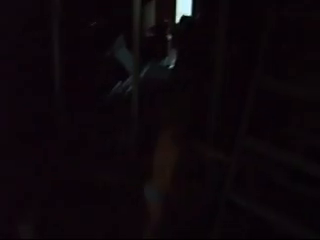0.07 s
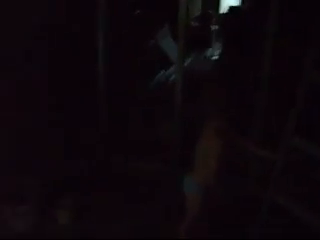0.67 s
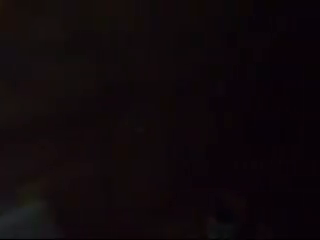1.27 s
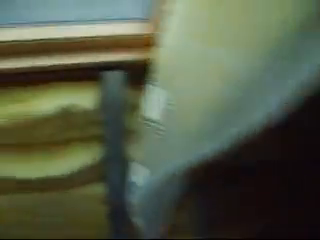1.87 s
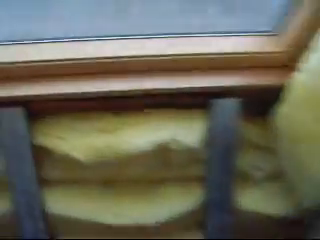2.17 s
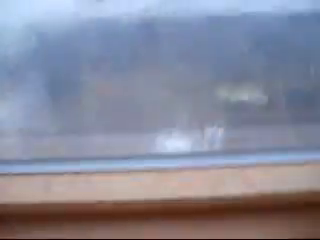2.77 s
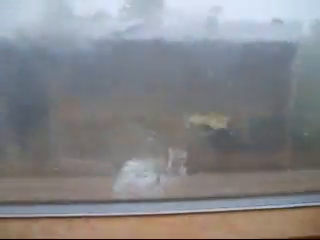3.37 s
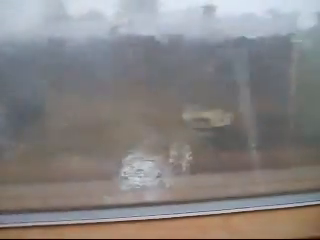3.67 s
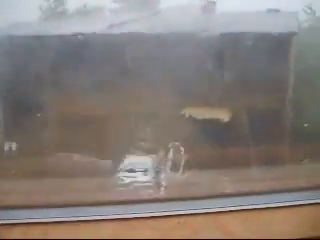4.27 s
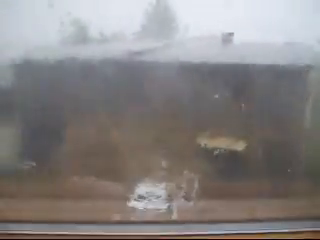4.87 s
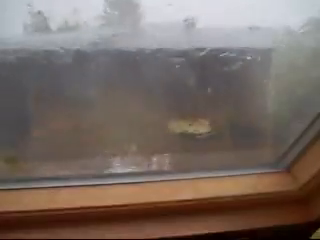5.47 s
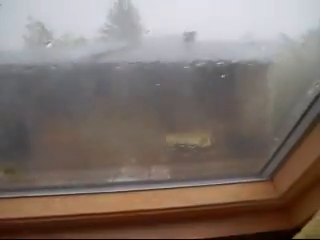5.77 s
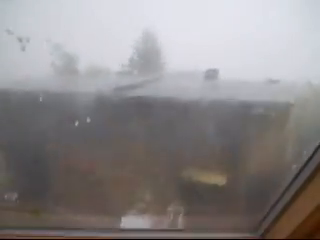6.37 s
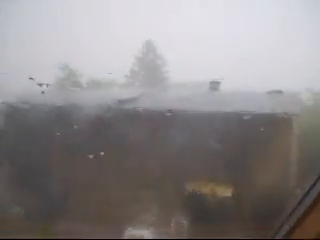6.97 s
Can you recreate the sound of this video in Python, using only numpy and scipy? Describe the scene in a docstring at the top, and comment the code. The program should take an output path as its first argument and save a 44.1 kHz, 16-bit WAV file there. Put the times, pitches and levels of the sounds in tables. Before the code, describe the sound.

Heard from inside an attic, a hailstorm batters the roof with a dense, uneven run of wooden knocks and rattles, heaviest at the start. Beneath them run a fine patter of small hail and a deep, steady rumble. Sharp cracks stand out as single stones hit the nearby roof window and shake its frame. Two of these, one in the middle and one just before the end, are loud enough to briefly distort the microphone.

```python
"""A bare attic under hail, heard from inside on the way up to a roof window.
Small hail patters over the storm's low rumble. Big stones far along the roof spread through the deck
as rattling bursts; those overhead knock on single boards, each with its own hollow note. Stones on
the window crack, rattle the sash and ring the pane; the loudest overload the microphone."""
import sys
import numpy as np
from scipy import signal
from scipy.fft import rfft, irfft
from scipy.io import wavfile
from scipy.ndimage import uniform_filter1d

SR = 44100
rng = np.random.default_rng(int(sys.argv[2]) if len(sys.argv) > 2 else 0)


def store_wav(level_fs):
    """Save 16-bit WAV to argv[1]."""
    pcm = np.round(np.clip(np.atleast_2d(level_fs), -1, 1) * 32767)
    wavfile.write(sys.argv[1], SR, pcm.T.astype(np.int16))


N = 313992
HIT_SAMPLES = 16384
AGE_S = np.arange(HIT_SAMPLES) / SR


def gain(db):
    """Decibels to amplitude."""
    return 10 ** (np.asarray(db) / 20)


def unit_rms(x):
    """Scales to an rms of 1."""
    return x / np.sqrt(np.mean(x ** 2) + 1e-20)


def smooth_noise(width, passes=1, count=HIT_SAMPLES):
    """Noise averaged over width points, rms 1."""
    noise = rng.standard_normal(count)
    for _ in range(passes):
        noise = uniform_filter1d(noise, size=width)
    return unit_rms(noise)


def lookup(table, hz):
    """Reads a table on a log-frequency axis."""
    freq_hz, value = np.transpose(table)
    return np.interp(np.log(hz + 1), np.log(freq_hz), value)


def add(mix, start_s, sound):
    """Mixes a sound in, in place."""
    part = mix[max(round(start_s * SR), 0):][:len(sound)]
    part += sound[:len(part)]


def swell(rise_s):
    """Onset with time constant rise_s."""
    return 1 - np.exp(-AGE_S / rise_s)


def mode(freq_hz, level_db, t60_s):
    """One damped resonance."""
    return gain(level_db - 60 * AGE_S / t60_s) * np.sin(2 * np.pi * freq_hz * AGE_S)


def contact(spectrum, hard_db_oct=0, thud_db=0, peak_hz=900, peak_db=0, peak_width=0.1,
            pivot_hz=700, ripple_db=0):
    """Click of energy 1: hard ice adds treble, a heavy stone bass, the struck spot a resonance."""
    hz = np.fft.rfftfreq(HIT_SAMPLES, 1 / SR) + 1
    db = lookup(spectrum, hz) + ripple_db
    db += hard_db_oct * np.maximum(np.log2(hz / pivot_hz), 0)
    db += thud_db * np.exp(-(np.log2(hz / 170) / 1.23) ** 2)  # bump at 170 Hz
    db += peak_db / (1 + (np.log(hz / peak_hz) / peak_width) ** 2)
    log_gain = np.log(gain(np.r_[db, db[-2:0:-1]]))
    minimum_phase = np.exp(signal.hilbert(log_gain).conj())[:len(hz)]
    click = irfft(minimum_phase, HIT_SAMPLES)[:HIT_SAMPLES // 8]
    return click / np.linalg.norm(click)


# Storm rumble spectrum: freq_hz, level_db
RUMBLE_SPECTRUM = [(25, 0), (55, -3), (95, 2), (200, -24.5), (800, -82)]

def rumble(level_db=-57.5):
    """The storm's steady, deep rumble through the house."""
    noise = signal.oaconvolve(rng.standard_normal(N), contact(RUMBLE_SPECTRUM))[:N]
    return gain(level_db) * unit_rms(noise)


# Ring time of deck and attic: freq_hz, t60_s
ATTIC_DECAY = [(100, 0.17), (260, 0.28), (700, 0.225), (1800, 0.24), (5000, 0.25), (8500, 0.255),
               (12000, 0.2)]

def reflections(click, echoes_per_s=5000, clump_db=1.5):
    """Separate echoes in deck and attic arrive in small clumps and die steadily."""
    taps = np.sign(rng.standard_normal(HIT_SAMPLES)) * (rng.random(HIT_SAMPLES) < echoes_per_s / SR)
    taps *= gain(clump_db * smooth_noise(110))
    echoes = irfft(rfft(taps) * rfft(click, HIT_SAMPLES))
    echoes /= np.sqrt(uniform_filter1d(echoes ** 2, size=700))  # energy flows out evenly
    hz, time_s, bands = signal.stft(echoes, SR, nperseg=256)
    decay = gain(-60 * time_s / lookup(ATTIC_DECAY, hz)[:, None])
    return signal.istft(bands * decay, SR, nperseg=256)[1][:HIT_SAMPLES]


# Small hail spectrum: freq_hz, level_db
PATTER_SPECTRUM = [(25, -33), (60, -29), (130, 11.5), (300, 4.5), (650, 9.5), (1000, 9.5), (1800, 6),
                   (3500, 0.5), (6000, -7.5), (9000, -17), (11000, -36), (13000, -38)]
# Small hail, louder deep in the attic than at the window: time_s, level_db
PATTER_ENVELOPE = [(0, -31), (1.45, -29.5), (1.88, -32.5), (2.88, -36.5), (4.1, -39.5), (4.7, -41),
                   (5.55, -33.5), (5.9, -43), (7.05, -34)]

def patter(stones_per_s=70, patches=8, size_spread_db=4.0, wash_gain=0.37):
    """Small stones land at random all over the roof, above an even wash of the farthest ones."""
    click, taps = contact(PATTER_SPECTRUM), np.zeros(N)
    for _ in range(patches):
        sizes = gain(size_spread_db * np.minimum(rng.exponential(1, N), 2))
        stones = sizes * (rng.random(N) < stones_per_s / patches / SR)
        taps += signal.oaconvolve(stones, reflections(click) * swell(0.0009))[:N]
    wash = signal.oaconvolve(rng.standard_normal(N), click)[:N]
    level_db = np.interp(np.arange(N) / SR, *np.transpose(PATTER_ENVELOPE))
    return gain(level_db) * unit_rms(unit_rms(taps) + wash_gain * wash)


def spot_ripple_db(depth_db=2.2):
    """Chance resonances of one struck spot: no two blows have the same colour."""
    return depth_db * smooth_noise(50, passes=2, count=HIT_SAMPLES // 2 + 1)


def chips(spectrum, hard_db_oct, ripple_db=0, chips_per_s=130, fade_s=0.11):
    """The stone shatters: a few chips, brighter than the stone, tick on the roof."""
    click = contact(spectrum, hard_db_oct + 0.71, ripple_db=ripple_db)
    ticks = np.sign(rng.standard_normal(HIT_SAMPLES)) * (rng.random(HIT_SAMPLES) < chips_per_s / SR)
    return signal.oaconvolve(1.6 * ticks * np.exp(-AGE_S / fade_s), click)[:HIT_SAMPLES]


# Roof board modes: pitch_ratio, level_db, t60_s
BOARD_MODES = [(0.789, -12.5, 0.096), (1, 3, 0.038), (1.23, -25, 0.046), (1.5, -10, 0.095)]

def board(pitch_hz):
    """The hollow ring of one roof board; its close modes beat."""
    return swell(0.0009) * sum(mode(pitch_hz * ratio, db, t60_s) for ratio, db, t60_s in BOARD_MODES)


# Spectrum of a blow on the roof: freq_hz, level_db
ROOF_SPECTRUM = [(30, -34), (65, -23), (110, -2.5), (170, -6), (330, -3.5), (480, 1.5), (680, 5), (1000, 5),
                 (1600, 0.5), (3200, -4), (5000, -11.5), (7800, -22), (9400, -34), (11000, -55)]
# Big stones along the roof: start_s, level_db, hard_db_oct, thud_db, distance_m
ROOF_STONES = [(0.0, -11, 0, 0, 1.6), (0.047, -7.5, 4, 3, 9.3), (0.075, -7, -2, 0, 11.6),
               (0.296, -12.5, 3, -5, 4.5), (0.375, -10, 4.5, 13, 4.3), (0.388, -9, -2, -5, 3.6),
               (0.431, -12.5, 1, -5, 4.1), (0.765, -19.5, 2, 3, 0.56), (0.908, -24, 6, 4, 0.49),
               (1.016, -14.5, 2.5, 8, 3.4), (1.043, -10.5, 2, 8, 6.4), (1.205, -9.5, 1, -4, 2.4),
               (1.512, -10.5, -1, 0, 6.4), (1.62, -10, 0.1, 1, 7.2), (1.679, -15.5, 0.5, -32, 1.9),
               (1.926, -21.5, 1, 3, 3.5), (1.972, -20, 3.5, 5, 5.1), (2.024, -19.5, 1, -7, 0.65),
               (2.212, -11.5, -2, 2, 5.7), (2.241, -15, 4, 4, 2.4), (2.398, -24, 1.5, 2, 4.6),
               (2.57, -12, 2, 1, 22), (2.705, -18, 3, -10, 5.9), (3.007, -16.5, 1, -31, 2.6),
               (3.108, -17.5, -0.5, 7.5, 4.5), (3.165, -13.5, 1.5, 4, 6.4), (3.32, -20, 2.5, 10.5, 5),
               (3.433, -18, 3, -8, 13.7), (3.541, -22, 1.5, 10, 3.1), (3.609, -17, -0.5, 6, 5.5),
               (3.651, -20, 1, 1, 1.1), (3.819, -13, -.5, 12, 4.4), (4.02, -30, -4.5, -46, 2.5),
               (4.129, -24, 0.5, 7, 14), (4.205, -14.5, 0.5, 10, 4.1), (4.288, -19.5, 1, 6.5, 2.6),
               (4.48, -23, 1.5, 6, 12), (4.589, -15.5, 1.5, -2, 2.1), (4.982, -22.5, 1, -1, 1.6),
               (5.108, -18.5, 0, 2, 5.3), (5.248, -15.5, -2.5, 4, 9.3), (5.278, -12.5, -1, -4, 8.6),
               (5.376, -19.5, 3, 10, 0.81), (5.57, -22.5, 0.5, 17, 3), (5.66, -19, 2, -18, 8.2),
               (5.71, -23.5, 1, -15, 0.89), (5.76, -23, 1.5, 15.5, 1.1), (5.797, -19, -1, -30, 1.9),
               (5.968, -22.5, 1, -3, 4.2), (6.112, -23, 1, 3, 2.3), (6.298, -20, 0.5, -13, 2.4),
               (6.361, -20, -1, 2, 15), (6.503, -16, -0.5, -11, 8.8), (6.6, -11, -2, -21, 23.5),
               (6.698, -12, 1.5, -10, 3.2), (6.772, -15, 2, -12, 7.4), (6.822, -15, -2, -5, 1),
               (7.067, -19.5, -4.5, -12, 1.5)]

def roof_hit(level_db, hard_db_oct, thud_db, distance_m, rise_s_per_m=0.0027, reach_m=2.3):
    """Near blows keep a tick and a faint board note; far ones spread through the deck and swell slower."""
    nearness = np.exp(-distance_m / reach_m)
    pitch_hz, ripple_db = rng.uniform(600, 1300), spot_ripple_db()
    click = contact(ROOF_SPECTRUM, hard_db_oct, thud_db, ripple_db=ripple_db)
    deck = reflections(click) + chips(ROOF_SPECTRUM, hard_db_oct, ripple_db)
    sound = deck * swell(rise_s_per_m * distance_m) + nearness * gain(-4.5) * board(pitch_hz)
    add(sound, 0, 5 * nearness * click)
    return gain(level_db - 0.14) * sound


def crack(click, clatter_s, room_db=-17, room_rise_s=0.0012):
    """A contact click, a few milliseconds of clatter in what was struck, then the room."""
    clatter = rng.standard_normal(HIT_SAMPLES) * np.exp(-AGE_S / clatter_s)
    clatter[0] -= 3  # first touch
    direct = signal.oaconvolve(clatter, click)[:HIT_SAMPLES]
    direct *= np.sqrt(clatter_s * SR / 2) / np.linalg.norm(direct)
    return direct + gain(room_db) * reflections(click) * swell(room_rise_s)


# Big stones overhead: start_s, level_db, hard_db_oct, thud_db, pitch_hz, ring_db, deck_db
OVERHEAD_STONES = [(0.292, -16, -5, -5, 724, 1, 6), (0.402, -17.5, -4, 3, 670, 3, 0.5),
                   (0.4729, -13.5, 0, 5, 554, 5, -0.5), (0.527, -18, -0.5, 4.5, 740, 8, 3.5),
                   (0.6215, -13, -1, -5, 755, 2, 3), (0.736, -19, 3.5, 1, 1366, -6, 0),
                   (1.295, -14, -1.5, 5, 778, 0, -8), (1.375, -21.5, 3, 6, 1180, -1, 4.5),
                   (1.8156, -15, 2, -6, 1670, -2.5, -15), (2.181, -19, -1.5, 3, 827, 8, 1.5),
                   (2.422, -16, 2.5, 18, 1790, -4.5, -9.5), (2.449, -19, 5, -14, 975, 1, -5),
                   (2.464, -17.5, -1, -2, 925, 5.5, 5.5), (2.751, -21.5, 0.5, -2.5, 835, 0, 4),
                   (3.044, -17, 0, 2, 1314, 7, -1.5), (3.241, -20.5, 1.5, 12.5, 1010, -4, -0.5),
                   (4.08, -24, -4, 6, 1026, 3.5, -1), (4.235, -20, 2.5, 0, 783, 6.5, -6.5),
                   (4.535, -23.5, -1.5, 9, 614, -10, 4.5), (4.635, -19.5, 1, 13, 556, 2.5, -9),
                   (4.745, -23, 0, -3, 810, -3, 4), (4.94, -21.5, 1.5, 9, 926, -11, -1),
                   (5.172, -20, 2.5, -4, 830, 5.5, 2), (5.431, -20, -0.5, -29, 770, -3, -1.5),
                   (5.553, -27, -4.5, -13, 710, 3, 1), (5.624, -26.5, -0.5, 10, 770, 4.5, 4.5),
                   (6.025, -25.5, 1, 8, 918, 2, -1), (6.789, -23.5, 1, -7, 670, 8, 3),
                   (7.08, -20.5, 2.5, 14, 854, 11.5, -5)]

def overhead_knock(level_db, hard_db_oct, thud_db, pitch_hz, ring_db, deck_db, slap_s=0.0085):
    """A hard crack, the board's note, its slap back on the rafter, then the deck and a few chips."""
    click = contact(ROOF_SPECTRUM, hard_db_oct, thud_db, pitch_hz, peak_db=4.5, peak_width=0.088,
                    ripple_db=spot_ripple_db())
    note = gain(ring_db) * board(pitch_hz)
    sound = crack(click, clatter_s=0.0028, room_db=deck_db, room_rise_s=0.001) + note
    add(sound, round(slap_s * pitch_hz) / pitch_hz, gain(-11) * note)  # slap in step with the swing
    sound += gain(deck_db - 3) * chips(ROOF_SPECTRUM, hard_db_oct)
    return gain(level_db) * sound


# Low pane modes: freq_hz, level_db, t60_s
PANE_MODES = [(167, -28.5, 0.38), (269, -27, 0.22), (325, -30, 0.24), (412, -35, 0.14), (562, -16, 0.07),
              (700, -14.5, 0.125)]

def pane(place_frac, roughness=0.48):
    """Low modes beat, roughened by the loose sash; the place of the blow decides which ones wake."""
    hum = 0
    for order, row in enumerate(PANE_MODES, 1):
        jostle = 1 + roughness * smooth_noise(400)
        hum += np.sin(order * np.pi * place_frac) * jostle * mode(*row)
    return hum * swell(0.019) * (1 - AGE_S / AGE_S[-1])  # the heavy pane is slow to swing


# Spectrum of a blow on the window: freq_hz, level_db
WINDOW_SPECTRUM = [(30, -16), (70, -9), (160, 1), (400, 1.5), (750, 2), (1300, -2), (2000, 0.5), (3000, -1),
                   (5000, -2.5), (8500, -9), (10200, -19), (13000, -37), (16000, -44)]
# Stones on the window: start_s, level_db, hard_db_oct, thud_db, clatter_s, spot_hz,
# rebound_step_db, rebound_hard_db_oct, sash_hz, place_frac
WINDOW_STONES = [(0.48, -7, 0, -11, 0.0035, 3970, -7.5, -3, 2420, 0.8),
                 (1.3124, -4.5, -9.5, 1, 0.0068, 1036, -10.5, -3, 1750, 0.15),
                 (1.791, -8, -4, -5.5, 0.0027, 753, -14, 3, 1670, 0.09),
                 (2.927, -23, 1.5, -15, 0.0052, 1060, -4.5, -8.5, 2450, 0),
                 (3.7198, 2, -2, -3, 0.0025, 3130, -8.5, -10, 615, 0.43),
                 (4.789, -9, -2, -10.5, 0.0055, 2900, -29, 11, 1040, 0.24),
                 (4.907, -20.5, -8, -1, 0.0056, 1120, -20, -14, 1700, 0.53),
                 (5.3153, -3, -9, -3.5, 0.0052, 1000, -9.5, -3, 1200, 0.12),
                 (5.489, -14.5, 0, -43, 0.01, 650, -6.5, -3, 2410, 0.1),
                 (6.838, 2.5, -9, 2, 0.0023, 834, -10.5, -3.5, 2400, 0.3)]

def window_hit(level_db, hard_db_oct, thud_db, clatter_s, spot_hz,
               rebound_step_db, rebound_hard_db_oct, sash_hz, place_frac, pivot_hz=1330):
    """The stone cracks on glass, the sash rattles in its frame, the stone lands again, the pane hums."""
    glass_click = contact(WINDOW_SPECTRUM, hard_db_oct, thud_db - 2, spot_hz,
                          peak_db=11.5, peak_width=0.028, pivot_hz=pivot_hz)
    sash_click = contact(WINDOW_SPECTRUM, rebound_hard_db_oct, thud_db, sash_hz,
                         peak_db=7, peak_width=0.14, pivot_hz=pivot_hz)
    sound = crack(glass_click, clatter_s)
    for rebound in (1, 2):
        gap_s = 0.0095 + 0.00046 * rng.uniform(-0.9, 1)
        add(sound, rebound * gap_s, gain(rebound * rebound_step_db) * crack(sash_click, clatter_s=0.0083))
    flight_s = 0.05 * gain(0.67 * level_db)  # weaker stones land again sooner
    bounce = crack(contact(WINDOW_SPECTRUM, hard_db_oct=0.5), clatter_s=0.0083)
    add(sound, flight_s, gain(-31.5) * bounce)
    sound += gain(thud_db + 8) * pane(place_frac)
    return gain(level_db + 1.5) * sound


def scene():
    """Big stones on roof and window over the patter and the rumble."""
    mix = patter() + rumble()
    for start_s, *blow in ROOF_STONES:
        add(mix, start_s, roof_hit(*blow))
    for start_s, *blow in OVERHEAD_STONES:
        add(mix, start_s, overhead_knock(*blow))
    for start_s, *blow in WINDOW_STONES:
        add(mix, start_s, window_hit(*blow))
    return mix[None]


def record(dry, cutoff_hz=13200):
    """The loudest cracks overload at full scale; a low-pass follows."""
    lowpass = signal.firwin(255, cutoff_hz, window=("kaiser", 8), fs=SR)
    return signal.oaconvolve(np.clip(dry, -1, 1), lowpass[None], "same")


dry = scene()
out = record(dry)
store_wav(out)
```